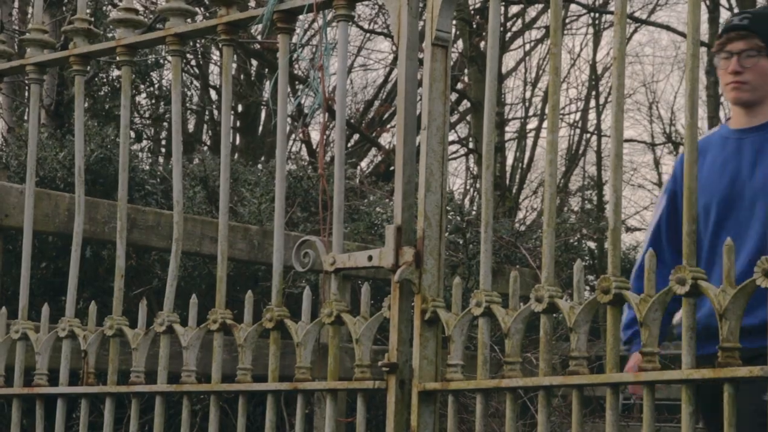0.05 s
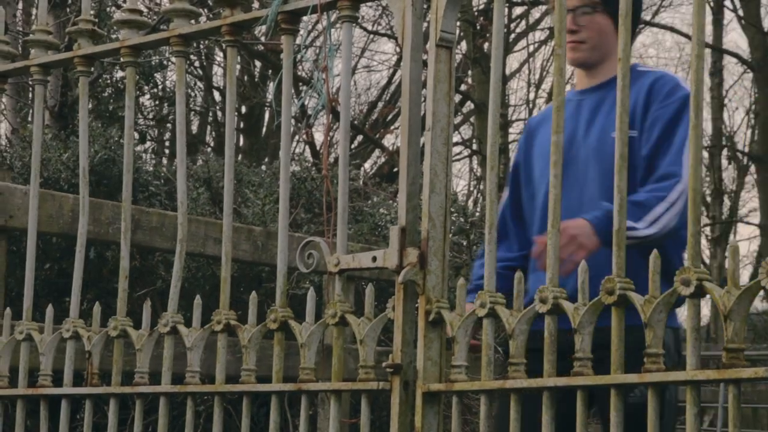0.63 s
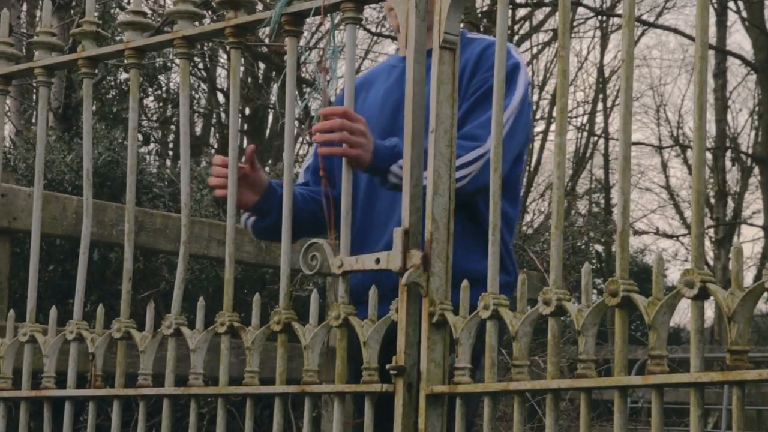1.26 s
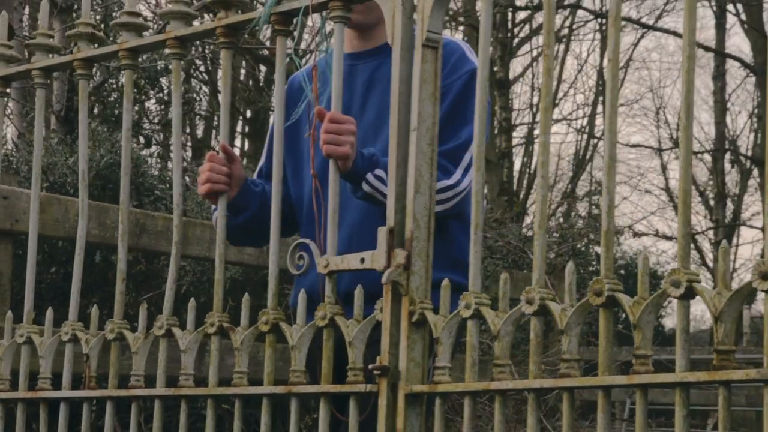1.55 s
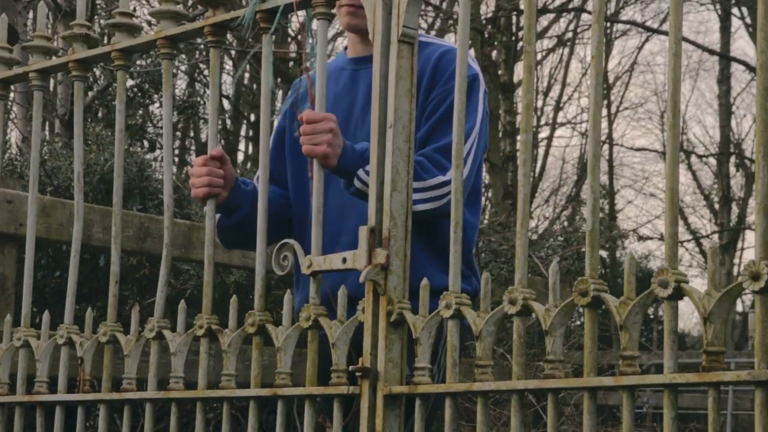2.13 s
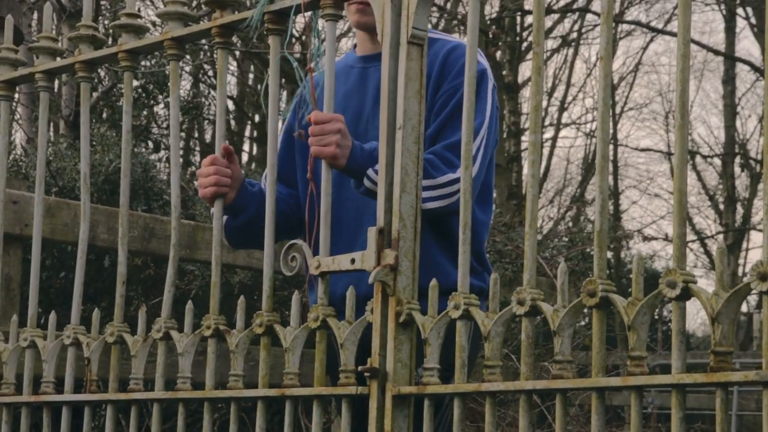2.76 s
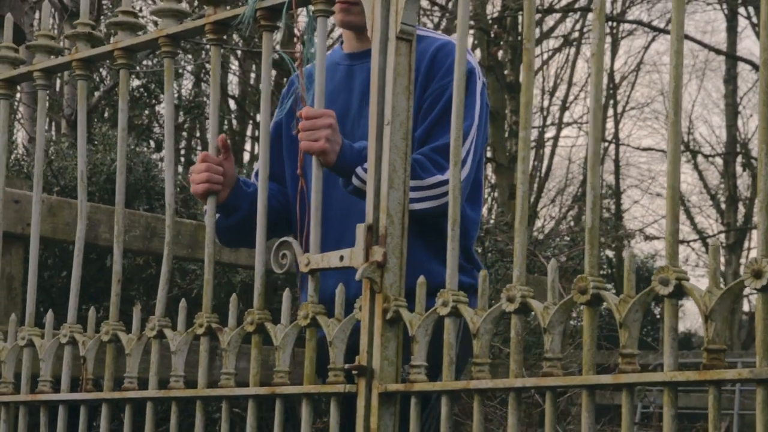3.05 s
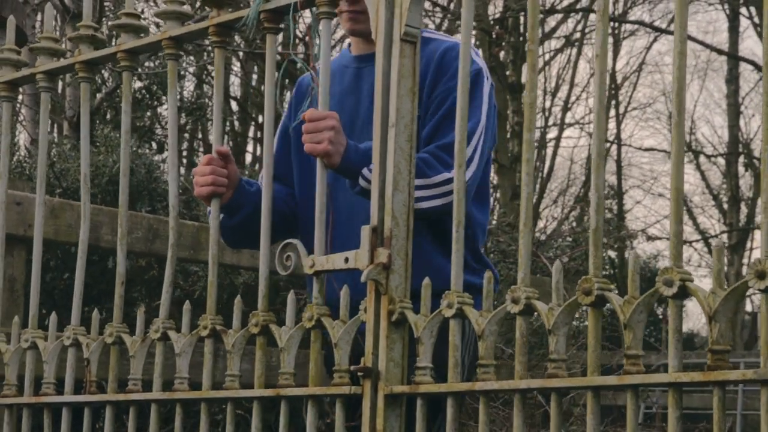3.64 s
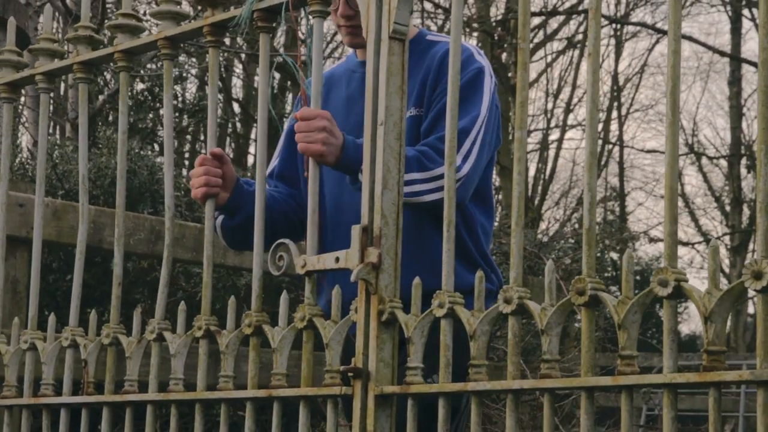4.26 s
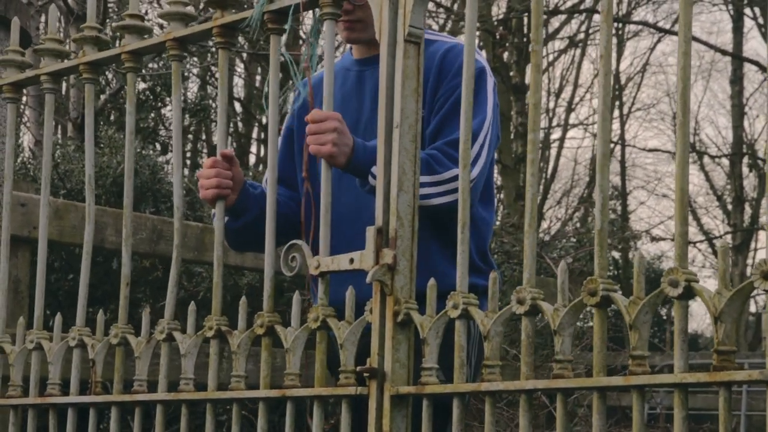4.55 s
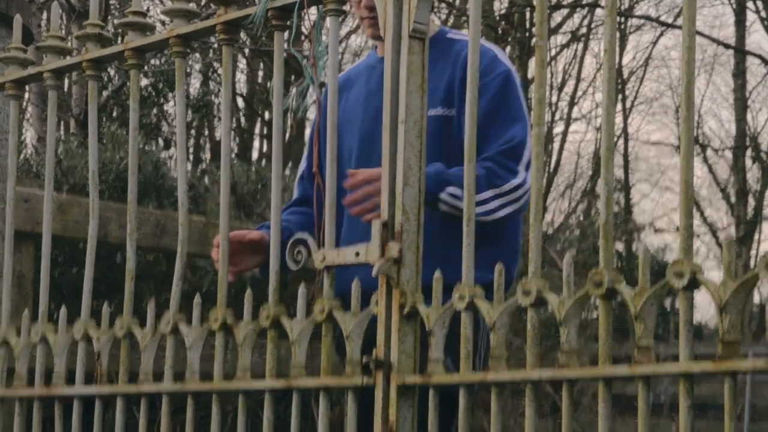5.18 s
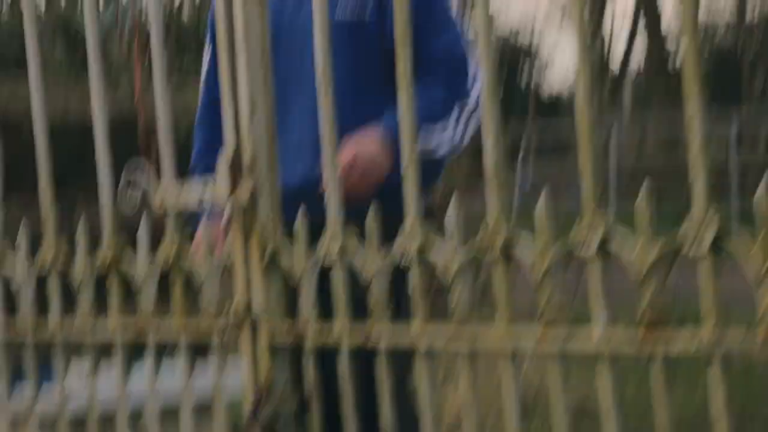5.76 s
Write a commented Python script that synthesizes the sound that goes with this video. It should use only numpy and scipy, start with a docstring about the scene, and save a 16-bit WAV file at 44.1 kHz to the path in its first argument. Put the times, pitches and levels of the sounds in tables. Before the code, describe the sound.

A low rumble of distant traffic and a faint hiss of trees run throughout. In the first second and a half, clothes rustle quietly and a couple of soft steps fall on dead leaves. A small bird whistles faint, gliding notes from about 1.2 to 3 seconds. Around 1.6 seconds hands land with dull knocks on a nearby iron gate, slightly to the right. At 1.8 seconds it is shaken loudly: the leaves clank and chatter, the bars ring and the rusty latch scrapes, easing off by 2.8 seconds. Another loud clank comes at 3.2 seconds, followed by a short rattle and scrape, then softer clanks and light grinding until about 4.6 seconds. From 5.2 seconds there is a soft knock, clothes swish, leaves crunch and twigs snap sharply underfoot, near 5.4 and again at 5.8 seconds. Low puffs of air bump the microphone between the snaps.

```python
"""Shaking a rusty gate

An iron gate is gripped and shaken outdoors: its two leaves clank and grind together, the bars ring
and the latch scrapes over rust. After a few softer pushes the hands let go; clothes rustle, twigs
snap underfoot and air buffets the microphones. A small bird whistles over the rumble of far traffic."""
import sys
import numpy as np
from scipy import signal
from scipy.fft import rfft, irfft, next_fast_len
from scipy.io import wavfile
from scipy.ndimage import uniform_filter1d

SR = 44100
rng = np.random.default_rng(int(sys.argv[2]) if len(sys.argv) > 2 else 0)


def generate_wav(signal):
    """Clip the signal to [-1, 1] and save it as 16-bit WAV at the path in sys.argv[1]."""
    frames = np.transpose(np.atleast_2d(signal))
    scaled = np.clip(frames, -1, 1) * 32767
    pcm = np.round(scaled).astype(np.int16)
    wavfile.write(sys.argv[1], SR, pcm)


N = 265041
TIME = np.arange(N) / SR


def amp(db):
    """Decibels to gain."""
    return 10 ** (np.asarray(db) / 20)


def unit_rms(x):
    """Scales a signal to rms 1."""
    return x / np.sqrt(np.mean(x ** 2) + 1e-20)


def curve_at(points, hz):
    """Reads a curve of (Hz, value) points on a log-frequency axis."""
    f, value = np.transpose(points)
    return np.interp(np.log(hz + 1), np.log(f + 1), value)


def panned(db):
    """Left and right gains for a pan in dB; positive is left."""
    return amp(np.array([np.atleast_1d(db), -np.atleast_1d(db)]) / 2)


def add(mix, s, sound):
    """Mixes a stereo sound in at s seconds."""
    part = mix[:, max(round(s * SR), 0):][:, :sound.shape[1]]
    part += sound[:, :part.shape[1]]


def swell(s, length, attack_s, release_db_per_s):
    """Envelope of one movement: it builds up, holds and dies away."""
    attack = np.clip((TIME - s) / attack_s, 0, 1)
    return attack * amp(-release_db_per_s * np.maximum(TIME - s - length, 0))


def flutter(size, smoothing):
    """A random wobble of rms 1, smoothed over a number of samples."""
    return unit_rms(uniform_filter1d(rng.standard_normal(size), smoothing))


def stereo_spectrum(pair, hz, colour, likeness):
    """Blends two random spectra to a left-right likeness and gives them a colour."""
    left, other = pair
    shared = np.clip(curve_at(likeness, hz), -1, 1)
    right = shared * left + np.sqrt(1 - shared ** 2) * other
    return np.array([left, right]) * amp(curve_at(colour, hz))


def noise(colour, likeness):
    """Stereo noise of rms 1 with a given colour and left-right likeness."""
    size = next_fast_len(N)
    hz = np.fft.rfftfreq(size, 1 / SR)
    white = rfft(rng.standard_normal((2, size)))
    return unit_rms(irfft(stereo_spectrum(white, hz, colour, likeness), size)[:, :N])


def contact_colour(spectrum, bass_db, mid_db, treble_db, bass_hz=1000, treble_hz=4400):
    """EQ curve (Hz, dB) of a blow: a heavy contact brings out the bass, a hard one the treble."""
    hz = np.linspace(1, SR / 2, 1024)
    power = amp(curve_at(spectrum, hz)) ** 2
    bass = 1 / (1 + (hz / bass_hz) ** 8)
    treble = 1 / (1 + (treble_hz / hz) ** 10)
    mid = np.maximum(1 - bass - treble, 0)
    bands = (bass, bass_db), (mid, mid_db), (treble, treble_db)
    gain = sum(share * amp(db) ** 2 / np.mean(share * power) for share, db in bands)
    return np.column_stack([hz, 10 * np.log10(gain * power)])


def dense_modes(colour, decay, likeness, size, bands=12, rise_cycles=0.49):
    """Countless modes as bands of noise that die at their own speed, the low ones arriving last."""
    hz, t = np.fft.rfftfreq(size, 1 / SR), np.arange(size) / SR
    flat = np.exp(2j * np.pi * rng.random((2, len(hz)))) * np.sqrt(size)
    spectrum = stereo_spectrum(flat, hz, colour, likeness)
    centres = np.geomspace(150, 14000, bands)
    out = np.zeros((2, size))
    for centre, weights in zip(centres, np.eye(bands)):
        share = curve_at(np.column_stack([centres, weights]), hz)
        rise = 1 - np.exp(-(t * centre / rise_cycles) ** 2)
        fall = np.exp(-np.log(1000) * t / curve_at(decay, centre))
        out += irfft(spectrum * share, size) * rise * fall
    return out


# Tone of the outdoor bed. Each row: frequency in Hz, level in dB.
AIR_COLOUR = [(20, -28), (58, 0.5), (98, -5), (135, 1), (200, -4.5), (285, -5.5), (365, -15.5),
              (490, -13.5), (620, -19.5), (980, -17.5), (1250, -25), (2750, -29.5), (6000, -31.5),
              (16000, -40.5)]
# Its stereo image. Each row: frequency in Hz, left-right likeness (1 is mono).
AIR_LIKENESS = [(60, 0.96), (150, 0.99), (380, 0.93), (950, 0.57), (2380, 0.077), (5980, -0.15),
                (15000, 0.064)]


def open_air(level_db=-45.5):
    """Far traffic and trees: a steady, centred rumble under a faint, wide hiss."""
    return amp(level_db) * noise(AIR_COLOUR, AIR_LIKENESS)


# Body movements. Each row: start in seconds, length in seconds, swish in dB, crunch in dB.
MOVEMENTS = [(0.142, 0.064, -51.5, -54), (0.519, 0.069, -59.5, -52.5), (0.662, 0.058, -57, -49.5),
             (1.2, 0.057, -58, -54), (1.363, 0.15, -59, -53), (5.222, 0.18, -43, -36.5),
             (5.46, .16, -53, -43), (5.689, .33, -55, -41.5), (5.768, 0.043, -55, -66)]
# Tone of the cloth and of the dead leaves. Each row: frequency in Hz, level in dB.
SWISH_COLOUR = [(1000, -9), (2500, 5.5), (4500, 4), (6500, 2), (9000, -2.5), (16000, -15)]
CRUNCH_COLOUR = [(100, -12), (290, 6), (500, 1.5), (900, -2.5), (1800, -1), (3000, -13.5), (6000, -26),
                 (16000, -24)]


def rustle(crunch_db=-5, grain_db=0.5, clump_db=2):
    """Each movement swishes cloth and crunches dead leaves, in small grains that come in clumps."""
    swish, crunch = np.zeros((2, N))
    for s, length, cloth_db, leaves_db in MOVEMENTS:
        movement = swell(s, length, attack_s=0.033, release_db_per_s=194)
        swish += amp(cloth_db) * movement
        crunch += amp(leaves_db + crunch_db) * movement
    grains, clumps = flutter(N, smoothing=50), flutter(N, smoothing=500)
    texture = unit_rms(amp(grain_db * grains + clump_db * clumps))
    cloth = swish * noise(SWISH_COLOUR, likeness=[(2000, 0.76), (9000, 0.035)])
    leaves = crunch * noise(CRUNCH_COLOUR, likeness=[(400, 0.94), (3000, 0.27)])
    return texture * (cloth + leaves) * panned(db=0.5)


# Feet and hands landing. Each row: start in seconds, level in dB, pan in dB, bass in dB.
KNOCK_HITS = [(.604, -33.5, 1, -19), (0.858, -42, 2, -13), (1.62, -24.5, 8.5, -8), (1.696, -29, 14, -11),
              (1.72, -34.5, 14, -4.5), (1.768, -26.5, 7, -9), (1.8, -21.5, 0, -22),
              (5.188, -27.5, 6.5, -15.5)]
# Their dull tone. Each row: frequency in Hz, level in dB.
KNOCK_COLOUR = [(150, -16), (400, -6.5), (700, -5), (1100, -20), (2000, -25.5), (2700, -34), (3500, -38),
                (16000, -49)]


def knocks(gain_db=4):
    """Feet and hands land as soft, damped blows with no ring."""
    out = np.zeros((2, N))
    for s, db, pan_db, bass_db in KNOCK_HITS:
        colour = contact_colour(KNOCK_COLOUR, bass_db, mid_db=-12, treble_db=-32)
        thud = dense_modes(colour, decay=[(500, 0.067), (2500, 0.033)],
                           likeness=[(500, 0.52), (3000, 0.13)], size=4096, rise_cycles=3.13)
        add(out, s, amp(db + gain_db) * panned(pan_db) * thud)
    return out


# The song. Each row: start in seconds, length in seconds, first and last pitch in Hz, level in dB.
WHISTLES = [(1.17, 0.035, 4950, 4620, -49), (1.203, 0.035, 4840, 3850, -51.5),
            (1.397, 0.1, 4120, 4056, -48), (1.558, 0.024, 4880, 3950, -46), (1.631, 0.053, 5080, 6100, -45),
            (1.908, 0.043, 5900, 3500, -48), (1.982, 0.026, 3650, 3430, -45.5),
            (2.438, 0.031, 6750, 6950, -52), (2.469, 0.047, 7700, 5850, -55),
            (2.69, 0.032, 5150, 4780, -46.5), (2.737, 0.023, 4850, 4870, -46.5),
            (2.765, 0.032, 4150, 3750, -48), (2.793, 0.09, 3550, 3300, -51),
            (2.884, .02, 4050, 4000, -50.5), (2.945, 0.015, 3820, 3760, -45)]


def bird(gain_db=-2, echo_db=-5, echo_t60=0.54, waver=0.017, scoop=0.0277):
    """Gliding, quavering whistles that dip in pitch midway, scattered back faintly by the trees."""
    song = np.zeros((2, N))
    for s, length, first_hz, last_hz, db in WHISTLES:
        size = round(length * SR)
        progress = np.linspace(0, 1, size)
        glide = first_hz + (last_hz - first_hz) * progress
        dip = 1 - scoop * np.sin(np.pi * progress)
        quaver = 1 + waver * flutter(size, smoothing=200)
        phase = 2 * np.pi * np.cumsum(glide * dip * quaver) / SR
        whistle = np.sin(phase) * signal.windows.tukey(size, 0.45)
        add(song, s, panned(db=-3.5) * amp(db + gain_db) * whistle)
    t = TIME[:SR // 2]
    trees = rng.standard_normal((2, len(t))) * np.exp(-np.log(1000) * t / echo_t60)
    echo = signal.fftconvolve(song, trees / np.linalg.norm(trees[0]), axes=1)[:, :N]
    return song + amp(echo_db) * echo


# Ring of the bars and frame. Each row: pitch in Hz, dB when pulled, dB when pushed, t60 in seconds.
BAR_MODES = [(137.8, -7.5, 3.5, 1), (197.7, 0.5, -17, 1), (292.3, -14.5, -1.5, 0.63),
             (396.7, -3.5, -10, 0.83), (512, 2, -11, 0.45), (655, -29, -33, 0.5), (721, -2, -16.5, 0.49),
             (785, -7, 0, 0.22), (875, 4, 3, 0.18), (993, -7, -3, 0.58), (1188, -36, 4.5, 0.37),
             (1319, -6.5, -11, 0.87), (1490, -5.5, -1.5, 0.43), (1658, 10, 1.5, 0.086),
             (1715, -0.5, -0.5, 0.31), (1874, -6, -11, 0.47), (1940, -11.5, -15, 0.32),
             (2047, 6, -13, 0.23), (2165, -4, 2, 0.2), (2240, -7, -1.5, 0.38), (2380, -4, -0.5, 0.29),
             (2579, -3, -13, 0.23), (2850, -1, -16, 0.15), (2928, 14.5, -31, 0.11), (3200, 2, -2, 0.24),
             (3510, -19, 6, 0.16), (4280, 27.5, -27, 0.042), (4230, 12, -37, 0.045), (4650, 10.5, 0, 0.12)]
# Stereo image of the ironwork. Each row: frequency in Hz, left-right likeness.
GATE_LIKENESS = [(100, 1), (640, 0.99), (1400, 0.72), (3000, 0.55), (7000, 0.25), (15000, .05)]


def ringing_bars(colour, push, size, spread_db):
    """The bars ring as dying sines, struck a little differently by each blow."""
    hz, pulled_db, pushed_db, t60 = np.transpose(BAR_MODES)[:, :, None]
    t = np.arange(size) / SR
    db = pulled_db + push * (pushed_db - pulled_db) + curve_at(colour, hz)
    strength = amp(db + spread_db * rng.standard_normal(hz.shape))
    strike = strength * np.exp(2j * np.pi * rng.random(hz.shape))
    # A phase gap between left and right gives each mode its width.
    gap = np.arccos(np.clip(curve_at(GATE_LIKENESS, hz), -1, 1)) * rng.choice([-1, 1], hz.shape)
    left_right = np.array([strike * np.exp(0.5j * gap), strike * np.exp(-0.5j * gap)])
    waves = np.exp((2j * np.pi * hz - np.log(1000) / t60) * t)
    return (left_right[:, :, 0] @ waves).real


def chatter(body, fade_s, first_hit, slips_per_s):
    """A first contact and a fading spray of rusty micro-slips set a resonant body sounding."""
    t = np.arange(SR // 6) / SR
    slips = rng.choice([-1, 1], len(t)) * (rng.random(len(t)) < slips_per_s / SR) * np.exp(-t / fade_s)
    slips[0] = first_hit
    return signal.fftconvolve(body, slips[None] / np.linalg.norm(slips), axes=1)


# Iron on iron. Each row: start in seconds, level in dB, bass in dB, treble in dB,
# push from 0 (pulled shut) to 1 (pushed against the latch).
CLANK_HITS = [(1.8224, -11.5, -16, -16.5, 0.11), (1.83, -9.5, -19, -14, 0),
              (1.853, -15, -11.5, -18.5, 0.036), (1.891, -25, -0.5, -23, 0.21),
              (2.0372, -22, -3, -18, 0.49), (2.046, -17, -9.5, -18.5, 0.77),
              (2.085, -17.5, -12, -15.5, 0.72), (2.188, -25.5, -10.5, -15, 0.89),
              (2.198, -21.5, -15.5, -12, 0.18), (2.28, -19, -19, -8.5, 0.61),
              (2.352, -20.5, -21, -8.5, 0.57), (2.496, -29.5, -17.5, -34, 0.66),
              (2.644, -30, -18.5, -11.5, 0.67), (2.712, -28.5, -15, -15.5, 0.46),
              (3.1925, -11.5, -17.5, -15, 0.16), (3.21, -19.5, -21, -23, 0.037),
              (3.408, -28.5, -5.5, -17, 0.79), (3.416, -20.5, -15.5, -23, 0.86),
              (3.454, -24.5, -12, -13, 0.66), (3.874, -35.5, -8.5, -40, 0.44),
              (3.997, -38.5, -5.5, -29, 0.98), (4.089, -34.5, -13, -26, 0.96), (4.303, -25, -11, -45, 0.14),
              (4.468, -29.5, -11.5, -22, 1), (4.558, -33, -11.5, -38, 0.86)]
# Tone of the frame's many weaker modes. Each row: frequency in Hz, level in dB.
FRAME_COLOUR = [(60, -45), (180, -9), (450, -5), (900, -3), (1400, 2), (2350, 11.5), (3000, 4), (3700, 4),
                (4350, 0.5), (5100, -2.5), (6400, -3), (8000, -13.5), (11000, -19), (16000, -46)]
# Decay of the first clash and of its tail. Each row: frequency in Hz, t60 in seconds.
CLASH_T60 = [(150, 0.2), (800, 0.054), (2300, 0.13), (4000, 0.052), (7000, 0.049), (14000, 0.048)]
TAIL_T60 = [(150, 1), (800, 0.97), (2300, 0.48), (4000, 0.25), (7000, 0.12), (14000, 0.13)]


def clanks(tail_db=-8, bars_db=-19, bloom_s=0.004):
    """The gate's leaves strike and chatter: a short clash, then the frame and bars ring on."""
    out, size = np.zeros((2, N)), 2 ** 15
    bloom = 1 - np.exp(-np.arange(size) / SR / bloom_s)  # standing waves take a moment to build
    for s, db, bass_db, treble_db, push in CLANK_HITS:
        # Shut leaves damp each other; pushed, they hang loose, chatter longer and ring more.
        fade_s = np.interp(push, [0, 1], [0.005, 0.0052])
        ring_db = np.interp(push, [0, 1], [-6.5, 4.5])
        colour = contact_colour(FRAME_COLOUR, bass_db, mid_db=-11, treble_db=treble_db)
        clash = dense_modes(colour, CLASH_T60, GATE_LIKENESS, size=8192)
        tail = dense_modes(colour, TAIL_T60, GATE_LIKENESS, size)
        bars = ringing_bars(colour, push, size, spread_db=2.44)
        add(out, s, amp(db) * chatter(clash, fade_s, first_hit=3.0, slips_per_s=620))
        add(out, s, amp(db + ring_db) * bloom * (amp(tail_db) * tail + amp(bars_db) * bars))
    return out


# The latch sliding in its keeper. Each row: start in seconds, level in dB, fade time in seconds.
LATCH_SCRAPES = [(2.081, -17, 0.0047), (2.099, -30, .006), (2.151, -28, 0.0063), (2.171, -22.5, 0.0068),
                 (2.185, -19, 0.0065), (2.25, -30.5, 0.007), (2.409, -40, 0.0088), (2.501, -37.5, 0.016),
                 (2.762, -40.5, 0.0045), (3.416, -33, 0.048), (3.445, -31, 0.022)]
# Its bright resonances. Each row: frequency in Hz, width in Hz, level in dB.
LATCH_RESONANCES = [(2650, 120, 4.5), (3310, 150, -1.5), (4900, 240, 0.5), (5530, 320, 0.5),
                    (6100, 130, -9), (7660, 130, 4.5), (9620, 82, -3.5), (10700, 1500, -22)]


def latch(gain_db=-7, t60=0.084):
    """The latch tongue slips over rust, rasping through its damped resonances."""
    out, hz = np.zeros((2, N)), np.linspace(1, SR / 2, 1024)
    power = sum(amp(db) ** 2 / (1 + ((hz - f) / width) ** 2) ** 2 for f, width, db in LATCH_RESONANCES)
    colour = np.column_stack([hz, 10 * np.log10(power / power.mean())])
    for s, db, fade_s in LATCH_SCRAPES:
        ring = dense_modes(colour, [(5000, t60)], GATE_LIKENESS, size=8192)
        add(out, s, amp(db + gain_db) * chatter(ring, fade_s, first_hit=2.1, slips_per_s=510))
    return out


# Grinding between clanks. Each row: start in seconds, length in seconds, level in dB.
GRIND_SWELLS = [(2.39, .05, -44.5), (3.09, 0.15, -44), (3.467, 0.036, -57), (3.724, 0.062, -46),
                (4.01, 0.046, -47), (4.202, 0.17, -47), (4.56, 0.038, -56)]


def grind(gain_db=-2, bars_db=-23, slips_per_s=500):
    """The gate's leaves lean on each other, and a trickle of tiny slips keeps the frame murmuring."""
    colour = contact_colour(FRAME_COLOUR, bass_db=0, mid_db=0, treble_db=-7)
    bars = ringing_bars(colour, push=1, size=16384, spread_db=1)
    body = dense_modes(colour, CLASH_T60, GATE_LIKENESS, size=16384) + amp(bars_db) * bars
    slips = unit_rms(rng.standard_normal(N) * (rng.random(N) < slips_per_s / SR))
    pressure = sum(amp(gain_db + db) * swell(s, length, attack_s=0.033, release_db_per_s=121)
                   for s, length, db in GRIND_SWELLS)
    return signal.fftconvolve((pressure * slips)[None], body / np.linalg.norm(body[0]), axes=1)[:, :N]


# Twigs underfoot. Each row: start in seconds, level in dB, pan in dB, bass in dB, treble in dB.
TWIG_SNAPS = [(5.251, -25, 11.5, -11.5, -14), (5.354, -11, -5, -14, -20.5), (5.3575, -14, 10, -12.5, -18),
              (5.38, -23, 7, -26, -26), (5.397, -19, -1, -18, -8.5), (5.815, -21.5, 5.5, -13, -27),
              (5.829, -20, 9, -32, -15.5)]
# Their woody tone. Each row: frequency in Hz, level in dB.
TWIG_COLOUR = [(150, -14), (520, -22), (800, 8), (1100, -10.5), (2000, 2.5), (3100, 2.5), (5000, -6.5),
               (9000, -15), (16000, -25)]


def twigs(gain_db=5):
    """Dry wood cracks sharply and is still at once."""
    out = np.zeros((2, N))
    for s, db, pan_db, bass_db, treble_db in TWIG_SNAPS:
        colour = contact_colour(TWIG_COLOUR, bass_db, mid_db=-12, treble_db=treble_db)
        crack = dense_modes(colour, decay=[(800, 0.035), (3000, 0.015), (10000, 0.0096)],
                            likeness=[(700, 0.17), (8000, 0.064)], size=4096, rise_cycles=0.47)
        add(out, s, amp(db + gain_db) * panned(pan_db) * crack)
    return out


# Puffs of air. Each row: start in seconds, length in seconds, level in dB.
AIR_PUFFS = [(5.468, .08, -47), (5.689, 0.028, -36)]


def buffets():
    """Air hits the microphones as they swing away: low thumps, mostly on the left."""
    force = sum(amp(db) * swell(s, length, attack_s=0.02, release_db_per_s=284)
                for s, length, db in AIR_PUFFS)
    rumble = noise(colour=[(20, -16), (70, 10), (130, 4), (300, -27), (1000, -61)], likeness=[(100, 0.1)])
    return force * rumble * panned(db=9)


# Placement of the ironwork. Each row: frequency in Hz, pan in dB.
IRON_PAN = [(200, -0.5), (700, 2), (1300, -2), (4400, -1.5), (8000, -4.5), (15000, 2)]


def scene():
    """The gate a little to the right, the small sounds around it, and the open air."""
    placement = panned(curve_at(IRON_PAN, np.fft.rfftfreq(N, 1 / SR)))
    iron = irfft(rfft(clanks() + grind() + latch()) * placement, N)
    return iron + knocks() + twigs() + rustle() + bird() + buffets() + open_air()


def record(dry, cutoff_hz=15900):
    """A steep low-pass trims the very top of the mix."""
    lowpass = signal.firwin(511, cutoff_hz, window=("kaiser", 9), fs=SR)
    return signal.oaconvolve(dry, lowpass[None], "same")


dry = scene()
out = record(dry)
generate_wav(out)
```